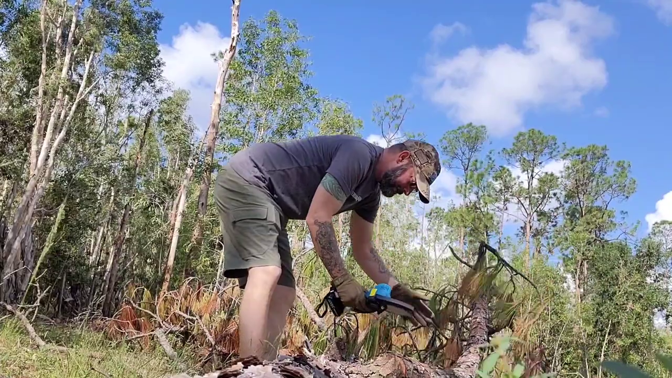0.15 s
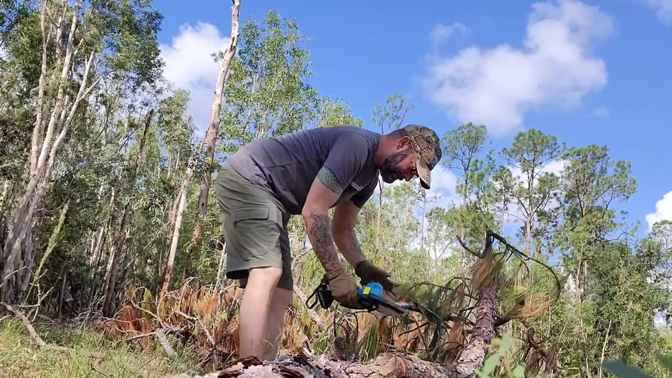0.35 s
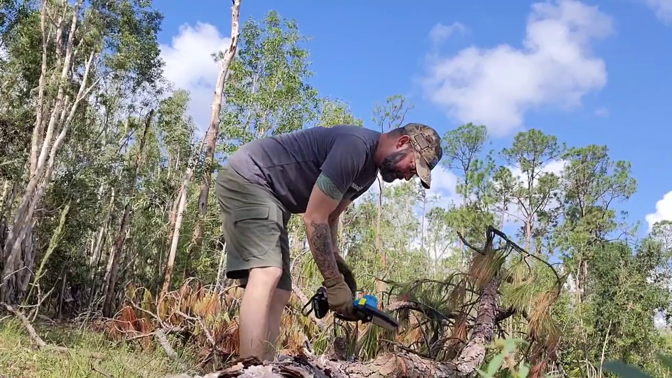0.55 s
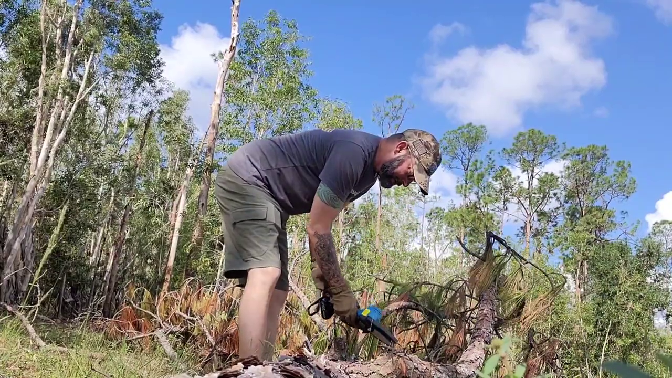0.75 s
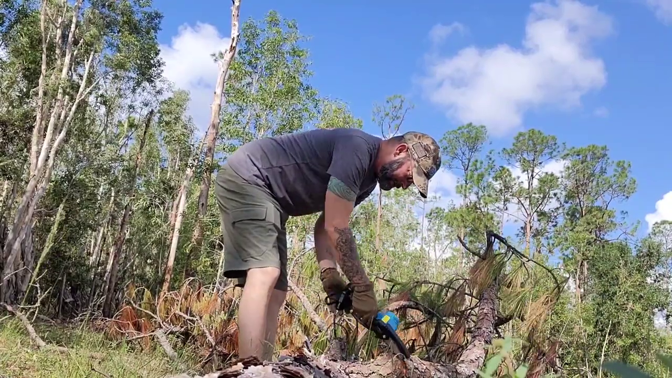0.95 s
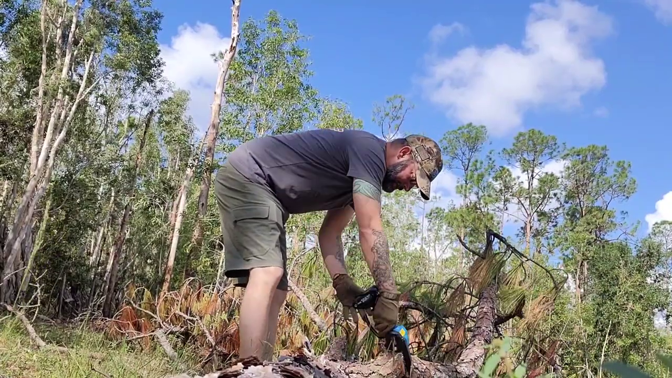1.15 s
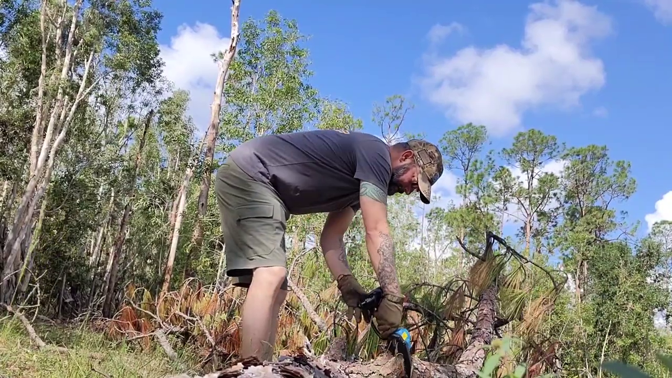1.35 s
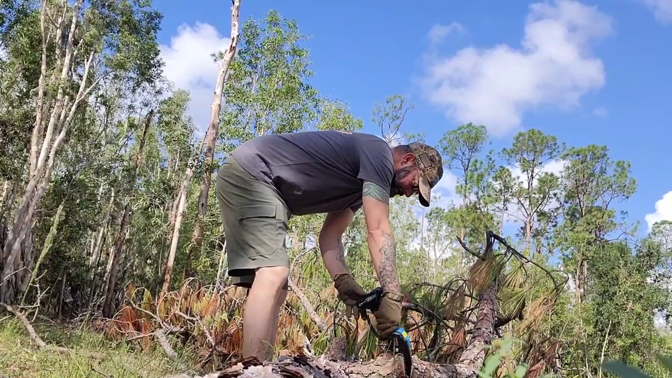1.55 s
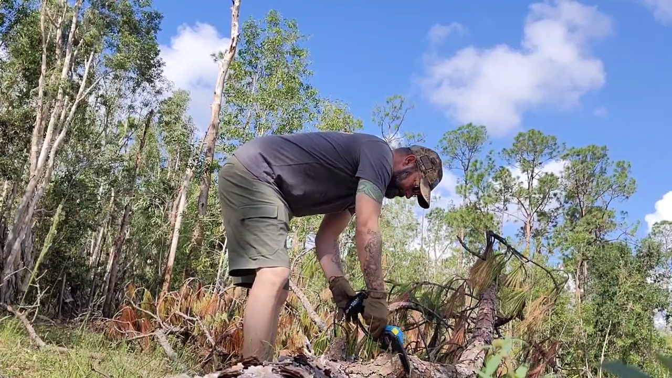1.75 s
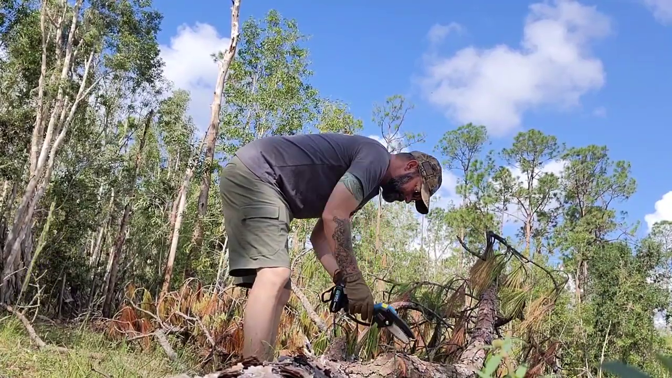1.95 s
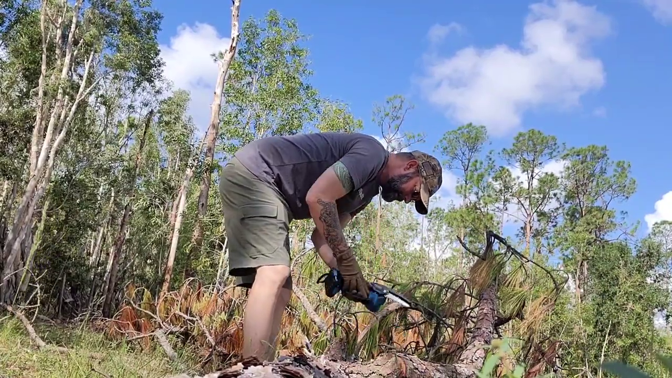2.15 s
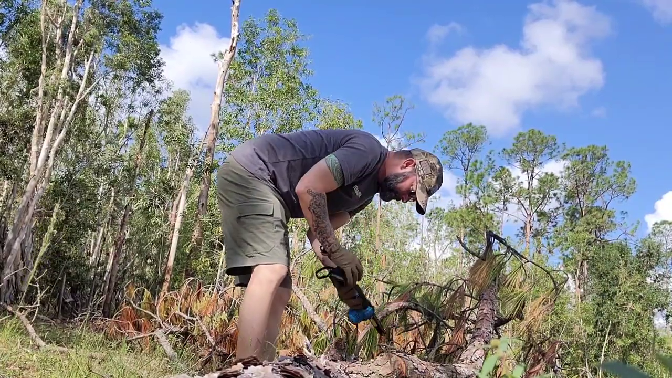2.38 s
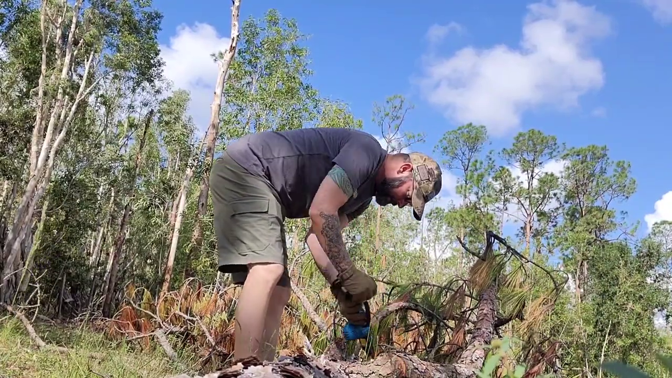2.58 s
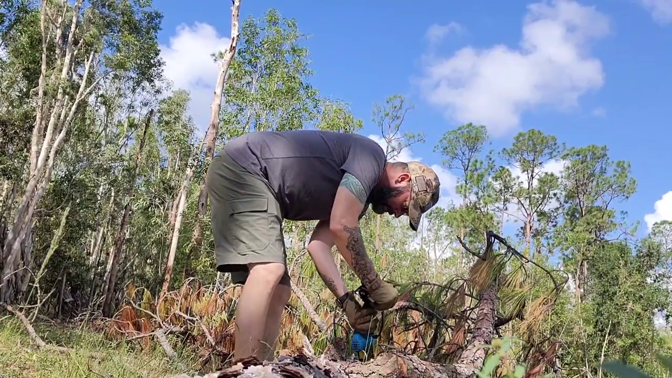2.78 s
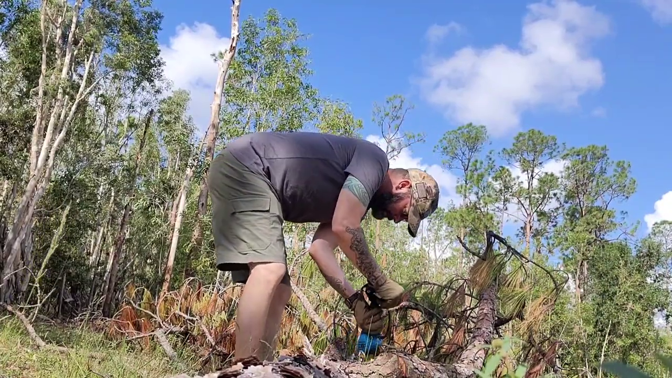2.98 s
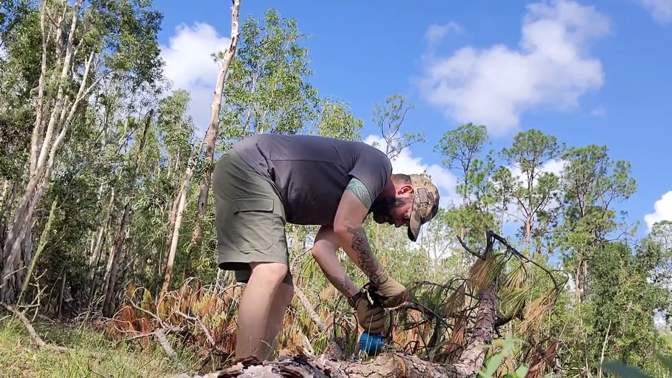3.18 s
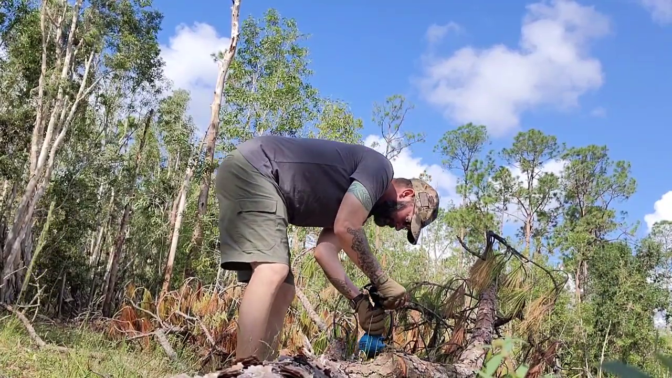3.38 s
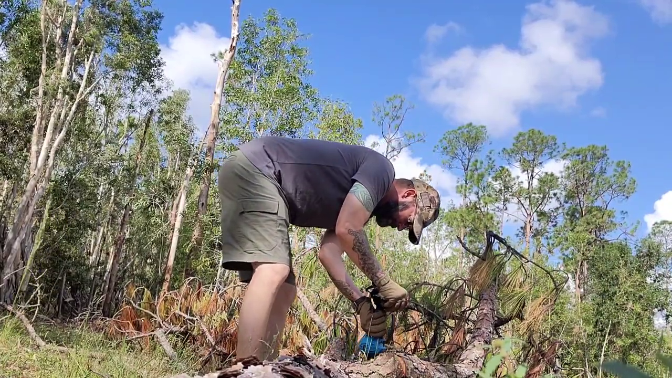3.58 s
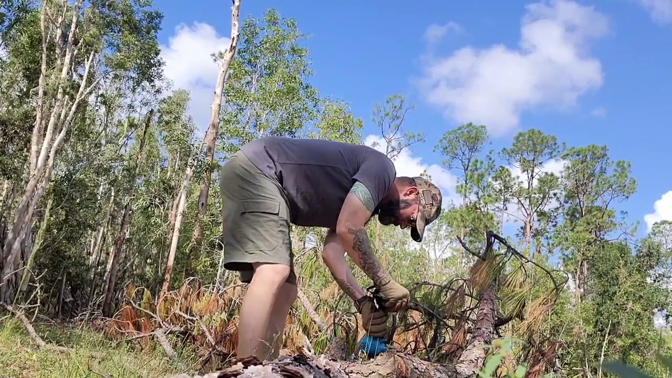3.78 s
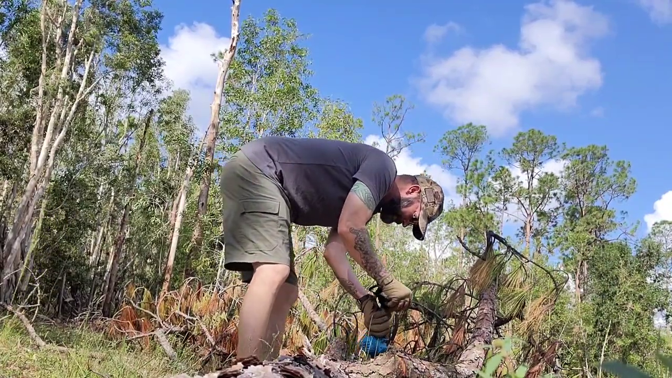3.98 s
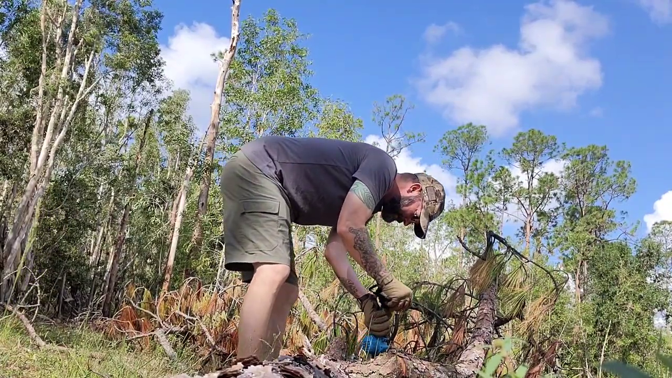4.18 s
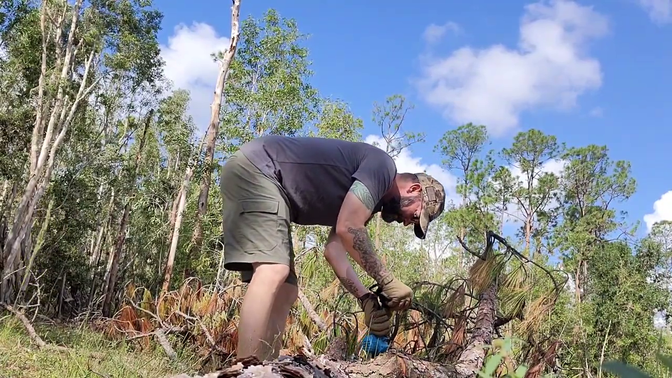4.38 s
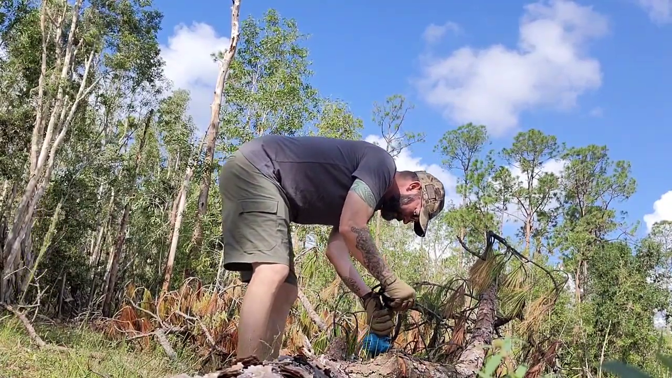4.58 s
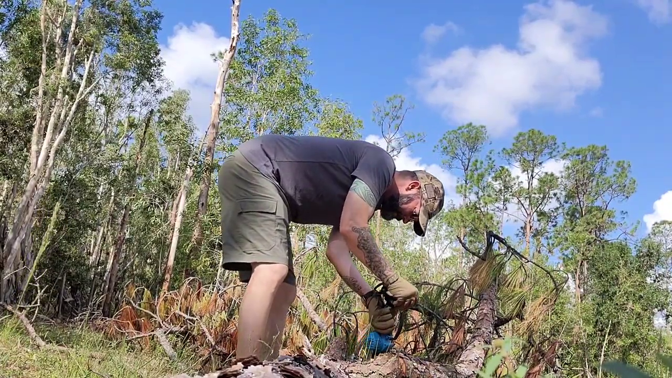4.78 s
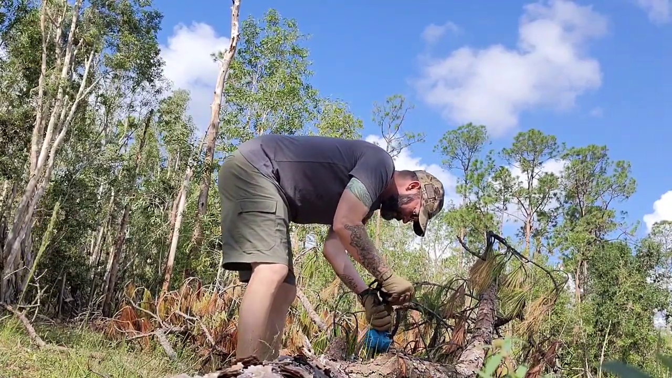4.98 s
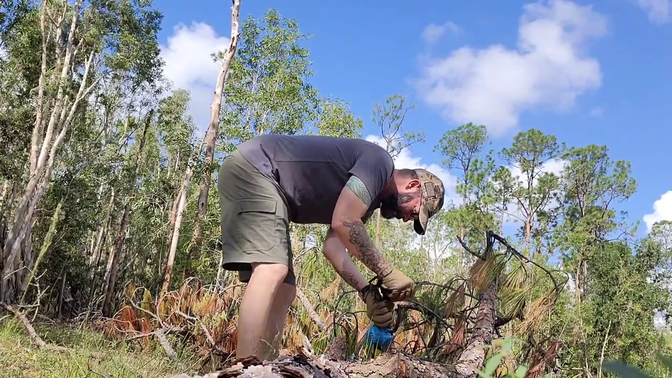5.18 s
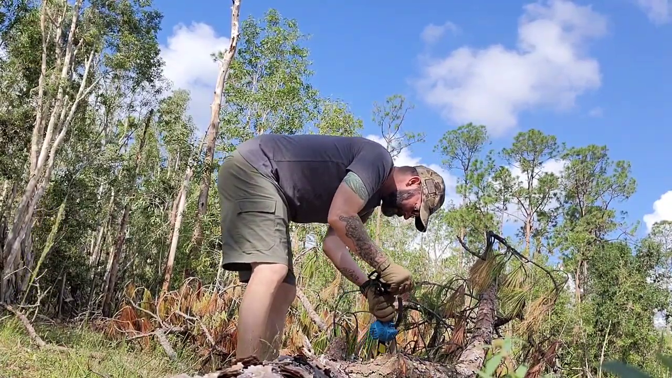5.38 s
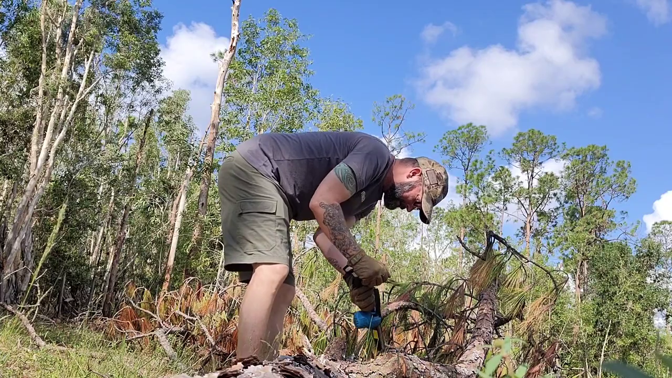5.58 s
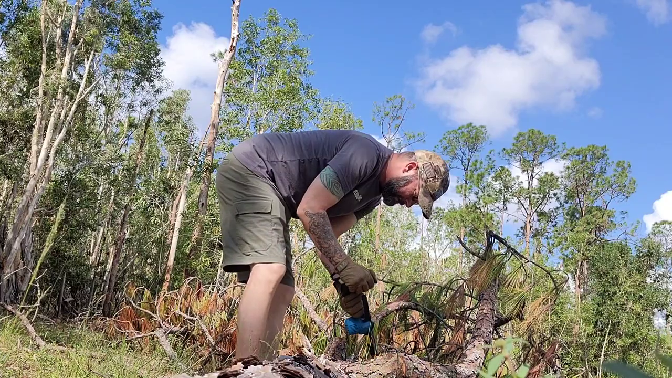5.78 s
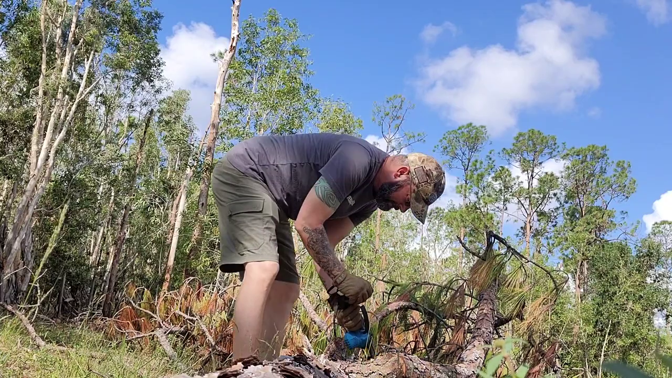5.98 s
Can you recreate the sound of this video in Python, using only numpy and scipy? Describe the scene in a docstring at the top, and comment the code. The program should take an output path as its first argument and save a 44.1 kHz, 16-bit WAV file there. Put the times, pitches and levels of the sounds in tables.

```python
"""Small cordless chainsaw on a fallen pine

The chain coasts to rest as a cut branch thumps down; twigs crack, needles rustle and the saw is shifted.
Insects sing, high tones shimmer and a far engine idles. Then the motor starts, labours as the cutters bite
into the log, and runs free again once they are through. Timed blows shake filtered bodies (links, cutters,
twigs, knocks); sines locked to the chain speed make the motor's tones; shaped noise makes air and insects.
"""
import sys
import numpy as np
from scipy import signal
from scipy.fft import rfft, irfft, next_fast_len
from scipy.io import wavfile
from scipy.ndimage import uniform_filter1d

SR = 44100
rng = np.random.default_rng(int(sys.argv[2]) if len(sys.argv) > 2 else 0)


def master(y):
    """Save y as 16-bit WAV."""
    cut = np.clip(np.atleast_2d(y).T, -1, 1)
    pcm = np.round(cut * 32767)  # scale
    wavfile.write(sys.argv[1], SR, pcm.astype(np.int16))


N = 266364
TIME = np.arange(N) / SR


def from_db(db):
    """Amplitude factor of a level in dB."""
    return 10 ** (np.asarray(db) / 20)


def rms_one(x):
    """Scale to rms 1."""
    return x / np.sqrt(np.mean(x ** 2) + 1e-20)


def in_time(rows):
    """The columns of a curve table at every sample."""
    s, *columns = np.transpose(rows)
    return [np.interp(TIME, s, column) for column in columns]


def between(start_s, end_s, fade_s):
    """Gain that fades in and out around two times."""
    return np.clip(np.minimum(TIME - start_s, end_s - TIME) / fade_s + .5, 0, 1)


def drift(rate_hz):
    """Slow chance with spread 1: two-pole low-passed noise, computed every 40 samples."""
    pole = np.exp(-80 * np.pi * rate_hz / SR)
    noise = rng.standard_normal(N // 40 + 2002)
    slow = signal.lfilter([1], [1, -2 * pole, pole * pole], noise)[2000:]
    return np.interp(np.arange(N) / 40, np.arange(len(slow)), rms_one(slow))


def coloured(x, spectrum):
    """Causal (minimum-phase) filter with the given spectrum."""
    size = 2 * next_fast_len(N // 2 + 4096)
    hz, db = np.transpose(spectrum)
    grid_hz = np.maximum(np.arange(size // 2 + 1) * SR / size, 1)
    gain_db = np.interp(np.log(grid_hz), np.log(np.maximum(hz, 1)), db)
    cepstrum = irfft(np.log(from_db(gain_db)))
    cepstrum[1:size // 2] *= 2
    cepstrum[size // 2 + 1:] = 0
    return irfft(rfft(x, size) * np.exp(rfft(cepstrum)))[..., :N]


def noise_pair(alike):
    """Two white noises with the given correlation."""
    alike = np.clip(alike, -1, 1)
    mid, side = rng.standard_normal((2, N))
    return np.sqrt((1 + alike) / 2) * mid + np.sqrt((1 - alike) / 2) * side * [[1], [-1]]


def clicks(seconds, sizes):
    """Single-sample blows at the given times."""
    out = np.zeros(N)
    index = np.round(np.asarray(seconds) * SR).astype(int)
    np.add.at(out, np.clip(index, 0, N - 1), sizes)
    return out


def strikes(turns, jitter, spread_db):
    """One blow per turn, each a little off in time and strength."""
    count = np.arange(1, int(turns[-1]))
    late, strength = rng.standard_normal((8000, 2))[:len(count)].T
    return clicks(np.interp(count + jitter * late, turns, TIME), from_db(spread_db * strength))


def dying(x, t60_s):
    """Every blow leaves an exponential tail."""
    return signal.lfilter([1], [1, -from_db(-60 / (t60_s * SR))], x + 1e-18)


def resonance(hz, centre_hz, width_hz):
    """Gain of a resonance for a tone that glides through it; 1 on top."""
    return 1 / np.hypot(1, 2 * (hz - centre_hz) / width_hz)


# left channel of the saw against the right: pitch_hz, gain_db
LEFT_BALANCE = [(60, -2), (110, -5), (200, -13.5), (380, -3), (700, 2), (1290, -3), (2380, 0.5),
                (4400, 0.5), (8120, -8.5), (15000, 3.5)]
LEFT_LAG_S = .00006


def placed(pair):
    """The saw is a little to the right: the left ear hears it later, with its own spectral balance."""
    left = coloured(np.interp(TIME - LEFT_LAG_S, TIME, pair[0]), LEFT_BALANCE)
    return np.array([left, pair[1]])


def sounding(shaking, spectrum):
    """A body shaken by a steady signal, at the saw's place; left-right mean has rms 1."""
    pair = placed(coloured(shaking, spectrum))
    return pair / np.sqrt(np.mean(pair.mean(axis=0) ** 2))


# outdoor air, relative spectrum: pitch_hz, density_db
AIR_SPECTRUM = [(12, -46), (20, -17), (37, -4), (87, -6.5), (150, -20), (182, -9), (250, -22.5), (344, -22),
                (473, -23.5), (611, -31.5), (1690, -44), (3200, -43.5), (4160, -83), (7040, -120)]
AIR_DB = -52.5


def low_air():
    """Low air: noise shaped by its spectrum, partly alike in both ears."""
    return from_db(AIR_DB) * rms_one(coloured(noise_pair(0.26), AIR_SPECTRUM))


# far engine's hum, before wavering and easing: pitch_hz, level_db
IDLE_TONES = [(48.4, -60), (80.7, -57), (177.6, -65)]


def far_engine():
    """Far idling engine: low tones wavering slowly, out of step between the ears."""
    apart_rad = np.array([[0], [1.2]])
    out = 0
    for hz, db in IDLE_TONES:
        phase = 2 * np.pi * hz * TIME + 0.17 * drift(1.8) + apart_rad
        out = out + from_db(db + 0.28 * drift(4.7)) * np.sqrt(2) * np.sin(phase)
    return out


# insect chorus, relative spectrum: pitch_hz, density_db
INSECT_SPECTRUM = [(1760, -57), (3000, -28), (3650, -12.5), (4540, -12.5), (5140, -14.5), (5600, -10),
                   (6950, -12.5), (7510, -8.5), (9140, -14.5), (10300, -19.5), (12000, -25), (16000, -30)]
INSECT_DB = -66.7


def insects():
    """Insect chorus: high shaped noise whose level wavers fast and slowly."""
    level_db = INSECT_DB + 0.39 * drift(22) + .5 * drift(1.7)
    return from_db(level_db) * rms_one(coloured(noise_pair(0.062), INSECT_SPECTRUM))


SHIMMER_DB, SHIMMER_TONES, SHIMMER_TURN_S = -65, 90, 1.3


def shimmer():
    """A crowd of thin high tones of unequal strength; one set gives way to the next."""
    size = next_fast_len(N)
    hz = np.arange(size // 2 + 1) * SR / size
    out, pair = 0, rfft(noise_pair(0), size)
    for s in np.arange(0, N / SR + SHIMMER_TURN_S, SHIMMER_TURN_S):
        scatter, strength = rng.standard_normal((2, SHIMMER_TONES))
        pitches_hz = np.linspace(3500, 9300, SHIMMER_TONES) + 22 * scatter
        lines = np.zeros(len(hz))
        lines[np.searchsorted(hz, pitches_hz)] = from_db(3.5 * np.clip(strength, -2, 2))
        lines = uniform_filter1d(lines, size=13)
        fade = np.cos(np.pi / 2 * np.clip((TIME - s) / SHIMMER_TURN_S, -1, 1))
        out = out + fade * rms_one(irfft(pair * lines, size)[:, :N])
    return from_db(SHIMMER_DB) * rms_one(coloured(out, INSECT_SPECTRUM))


def outdoors():
    """Air and far engine, a little left and easing by 4 dB near the end, under insects and shimmer."""
    easing = from_db(np.interp(TIME, [5.1, 5.5], [0, -4]))
    low = easing * (low_air() + far_engine()) * from_db([[1.5], [-1.2]])
    return low + insects() + shimmer()


# wood, rattle, hiss of the coasting chain, before each source's trim: start_level_db, speed_power
COAST_LAWS = [(-43.5, 2.23), (-47, 1.1), (-44, 2.4)]
COAST_S, COAST_CUTTERS_PER_S = .82, 122


def coasting():
    """Unpowered, the chain slows evenly, and each of its sounds dies with a power of the speed."""
    speed = np.clip(1 - TIME / COAST_S, 1e-4, 1)
    wood_db, rattle_db, hiss_db = [db + power * 20 * np.log10(speed) for db, power in COAST_LAWS]
    return COAST_CUTTERS_PER_S * speed, wood_db, rattle_db, hiss_db


CUTTERS_PER_REV, FLUTTER_DB = 3.5, 2.2


def flutter(turns):
    """The chain tightens and slackens two and, more weakly, three times per turn of the sprocket."""
    sprocket = 2 * np.pi * turns / CUTTERS_PER_REV
    return np.sin(2 * sprocket) + .6 * np.sin(3 * sprocket)


# saw housing, relative spectrum: pitch_hz, density_db
HOUSING_SPECTRUM = [(200, -20), (700, -19.5), (1100, -6), (1270, -10.5), (1650, 0.5), (1900, -5),
                    (2150, 1.5), (2400, -1.5), (2900, -4.5), (3400, -20), (4400, -16), (7000, -24.5),
                    (16000, -69)]
# chain and bar steel, relative spectrum: pitch_hz, density_db
STEEL_SPECTRUM = [(1500, -18.5), (3500, -18), (4150, -13), (4600, -28), (5000, -6), (5450, -4), (5850, -14),
                  (6600, -2), (7300, -2), (7800, 3.5), (8900, -4.5), (10100, -3), (11300, -8), (13000, 0.5),
                  (15500, 0.5), (17000, -5.5)]
LINK_T60_S, SWING_DB = .028, 1.3
RATTLE_TRIM_DB, HISS_TRIM_DB = -2.0, 0.2


def chain(turns, rattle_db, hiss_db):
    """Links slap sprocket and bar 4x per cutter; level swings per cutter pair, flutters at full speed."""
    links = strikes(4 * turns, jitter=.08, spread_db=3)
    slaps = rms_one(dying(links, LINK_T60_S))
    fast = np.interp(np.gradient(turns) * SR, (136, 140), [0, 1])   # cutters per s
    swing_db = SWING_DB * (-1.5 - fast) * np.sin(np.pi * turns)
    swing = from_db(swing_db + FLUTTER_DB * fast * flutter(turns))
    rattling = slaps * swing * from_db(0.28 * drift(35.2)) * noise_pair(0.87)
    hissing = (slaps + 1.78) * np.sqrt(swing) * from_db(1.1 * drift(16)) * noise_pair(0.46)
    rattle = from_db(rattle_db + RATTLE_TRIM_DB) * sounding(rattling, HOUSING_SPECTRUM)
    return rattle + from_db(hiss_db + HISS_TRIM_DB) * sounding(hissing, STEEL_SPECTRUM)


# torn log, relative spectrum: pitch_hz, density_db
LOG_SPECTRUM = [(60, -15), (150, -13), (260, -24), (360, 4), (430, -6), (520, 0.5), (620, -4.5), (800, 0),
                (950, -2.5), (1200, -11.5), (1600, -13), (4000, -62)]
# evenly chopped log, relative spectrum: pitch_hz, gain_db
CHOP_SPECTRUM = [(100, -18), (230, -12.5), (350, -18.5), (480, 10), (580, -3.5), (700, 5.5), (820, 12.5),
                 (885, 4), (955, 8), (1100, -2.5), (1250, 2.5), (1500, -9), (4000, -72)]
WOOD_TRIM_DB, GROWL_REL_DB, GROWL_WAVER_DB = -4.0, 3.5, 2


def kerf(turns, wood_db, even):
    """Even bites growl in wavering harmonics of the cutter rate; a chattering saw tears fibres at random."""
    even = np.clip(even, 0, 1)
    angle = 2 * np.pi * turns + .05 * drift(25)
    chops = 0
    for k in range(1, 14):
        chops = chops + from_db(GROWL_WAVER_DB * drift(9)) * np.cos(k * angle + .2 * drift(15))
    tears = dying(strikes(turns, jitter=0.18, spread_db=1.2), t60_s=0.038) * noise_pair(0.97)
    tears = tears * from_db(1.4 * np.sin(np.pi * turns))   # the cutters of one side bite deeper
    growl = from_db(GROWL_REL_DB) * even * sounding(np.array([chops, chops]), CHOP_SPECTRUM)
    tearing = (1 - even) ** .75 * sounding(tears, LOG_SPECTRUM)
    return from_db(wood_db + WOOD_TRIM_DB) * (growl + tearing)


# cracking twigs and knocks on the saw, drive levels:
# start_s, ring_hz, ring_db, wood_db, snap_db, t60_s
CRACK_EVENTS = [(0.061, 2650, -26, -23, -43, 0.03), (0.0667, 2170, -32, -31, -19, 0.022),
                (0.133, 2190, -48, -42.5, -54, 0.14), (0.339, 2100, -45, -66, -36, 0.2),
                (0.463, 2230, -55, -66, -60, .06), (0.565, 1690, -54, -51, -66, 0.068),
                (0.616, 1690, -59.5, -55.5, -68, 0.089), (0.701, 2200, -66, -53.5, -73, 0.074),
                (0.836, 1600, -60, -60, -75, 0.11), (1.024, 1720, -61, -59, -49, 0.066),
                (1.18, 1900, -55, -60, -55, 0.06), (1.247, 2100, -53, -49.5, -50, 0.08),
                (1.313, 2520, -50.5, -42.5, -61, 0.032), (1.686, 2470, -61, -74, -65, .06),
                (1.744, 2300, -62, -63, -73, 0.14), (1.845, 1570, -47, -57, -43.5, 0.056),
                (2.2109, 2330, -35, -39, -45, 0.016), (2.215, 2500, -43, -51, -40, 0.02),
                (2.226, 2400, -38.5, -47, -40, 0.033), (2.24, 2600, -55.5, -63, -66, 0.25),
                (2.93, 2660, -43, -54, -51, 0.038)]
SNAP_T60_S = 0.023   # of the sharp snap, whatever the row's t60_s


def cracks():
    """Bursts of splintering and contact ring at their own pitch and also sound the wood and the steel."""
    grain, out, wood = noise_pair(0.37), 0, 0
    for s, hz, ring_db, wood_db, _, t60_s in CRACK_EVENTS:
        burst = dying(clicks([s], 0.88), t60_s) * grain
        b, a = signal.iirpeak(hz, 4.5, fs=SR)
        out = out + from_db(ring_db) * signal.lfilter(b, a, burst) / np.sqrt(b[0])
        wood = wood + from_db(wood_db) * burst
    s, _, _, _, snap_db, _ = np.transpose(CRACK_EVENTS)
    snap = dying(clicks(s, from_db(snap_db)), SNAP_T60_S) * grain
    for bursts, spectrum in ((wood, LOG_SPECTRUM), (snap, STEEL_SPECTRUM)):
        out = out + coloured(bursts, spectrum) / np.std(coloured(grain[0], spectrum))
    return placed(out)


# branch landing and bouncing, upper-band blows: start_s, peak_db
THUMP_EVENTS = [(0.0628, -12.5), (0.0675, -24), (0.134, -39), (0.2068, -30), (0.231, -40), (0.511, -48),
                (0.557, -50)]


def thuds(rows, low_hz, high_hz):
    """Heavy, damped wood rings for only a cycle or two."""
    s, db = np.transpose(rows)
    body = signal.butter(2, [low_hz, high_hz], "band", fs=SR, output="sos")
    height = np.abs(signal.sosfilt(body, signal.unit_impulse(2000))).max()
    return signal.sosfilt(body, clicks(s, from_db(db)) + 1e-18) / height


def landing():
    """The branch lands: each blow rings an upper band and, 13 dB weaker, a lower one."""
    upper = thuds(THUMP_EVENTS, low_hz=534, high_hz=916)
    return upper + from_db(-13.0) * thuds(THUMP_EVENTS, low_hz=150, high_hz=383)


# needle rustle, before wavering: time_s, level_db
RUSTLE_LEVEL = [(0.36, -80), (0.46, -64), (0.64, -65), (0.72, -70), (1.0, -72.5), (1.3, -76), (1.7, -100)]


def needles():
    """Dry needles rustle as the fallen branch settles: wavering bright noise."""
    level_db = in_time(RUSTLE_LEVEL)[0] + 1.5 * drift(40)
    return from_db(level_db) * sounding(noise_pair(0.26), STEEL_SPECTRUM)


# two knocks as the saw is shifted, then the trigger click: start_s, drive_db
KNOCK_EVENTS = [(2.2109, -33), (2.2234, -32.5), (2.894, -51.5)]
# modes of the knocked saw: pitch_hz, relative_db, t60_s
KNOCK_MODES = [(760, -15, 0.028), (1600, -16, 0.049), (2380, 3, 0.018), (2740, -12, 0.062),
               (3900, -14.5, 0.039), (5850, -2, 0.022), (6850, -5, 0.024), (8700, -13, 0.022)]


def knocks():
    """Each knock sets the saw's modes ringing."""
    s, drive_db = np.transpose(KNOCK_EVENTS)
    t, ring = TIME[:SR], 0
    for hz, db, t60_s in KNOCK_MODES:
        ring = ring + from_db(db - 60 * t / t60_s) * np.sin(2 * np.pi * hz * t)
    out = signal.fftconvolve(clicks(s, from_db(drive_db)), ring)[:N]
    return placed([out, out])


# bar bounces and the cutters dig in: start_s, length_s, extra_db
DIG_EVENTS = [(3.019, 0.053, 9), (3.431, 0.029, 3), (3.514, 0.066, 2.5), (3.674, 0.025, 3.5),
              (3.732, 0.13, 3), (3.914, 0.039, 5), (4.079, 0.12, 3), (4.179, 0.074, 4.5), (4.27, 0.15, 3),
              (4.458, 0.056, 2), (4.586, 0.15, 2), (5.034, 0.052, 0.5), (5.22, 0.025, 5)]
DIG_ATTACK_S, DIG_RELEASE_S = 0.0087, 0.023


def digging():
    """Extra dB while the cutters dig in: attack, hold, release."""
    out = 0
    for s, length_s, db in DIG_EVENTS:
        attack = (TIME - s) / DIG_ATTACK_S
        release = (s + length_s - TIME) / DIG_RELEASE_S + 1
        out = out + db * np.clip(np.minimum(attack, release), 0, 1)
    return out


# bar buzz, strongest running free, before trim and flutter: time_s, level_db
BUZZ_LEVEL = [(2.98, -60), (3.15, -44.5), (3.4, -41.5), (3.7, -40), (4.1, -48.5), (5.1, -44), (5.42, -59),
              (5.55, -40), (5.66, -33.5), (5.86, -37.5), (5.95, -42), (6.04, -55)]
# side tones of the running chain at full buzz, before trim: cutter_rate_multiple, level_db
CHAIN_TONES = [(4, -55), (4.55, -58), (8.571, -48), (10.17, -52), (12, -47), (12.571, -47)]
# bar rubbing the side of the kerf: pitch_hz, level_db, start_s, end_s
SQUEAL_TONES = [(1431, -43.5, 4.97, 5.11), (2513, -50.5, 4.5, 4.7), (2945, -49, 4.85, 5.12)]
BAR_RING_HZ, BAR_RING_WIDTH_HZ, SQUEAL_FADE_S = 1717, 310, 0.057
BUZZ_TRIM_DB, TONES_TRIM_DB, TONES_DB_PER_BUZZ_DB = -2.5, -1, 0.16


def bar(angle, rate):
    """Sprocket turns shake the bar: a comb of lines buzzes in its resonance; it sings at fixed pitches."""
    buzz_db, = in_time(BUZZ_LEVEL)
    orders = np.arange(36, 50) / CUTTERS_PER_REV
    gains = np.array([resonance(order * rate, BAR_RING_HZ, BAR_RING_WIDTH_HZ) ** 3 for order in orders])
    comb, tones, squeal = 0, 0, 0
    for order, gain in zip(orders, gains):
        comb = comb + gain * np.sin(order * angle + 2 * np.pi * rng.random() + .75 * drift(14))
    comb = comb / np.sqrt(np.sum(gains ** 2, axis=0) + 0.26)
    buzz = from_db(buzz_db + FLUTTER_DB * flutter(angle / (2 * np.pi)) + BUZZ_TRIM_DB) * comb
    for order, db in CHAIN_TONES:
        tones = tones + from_db(db + drift(10)) * np.sin(order * angle + .25 * drift(12))
    tones = tones * from_db(TONES_TRIM_DB + TONES_DB_PER_BUZZ_DB * (buzz_db - buzz_db.max()))
    for hz, db, start_s, end_s in SQUEAL_TONES:
        tone = np.sin(2 * np.pi * hz * TIME + 0.64 * drift(31))
        squeal = squeal + from_db(db) * between(start_s, end_s, SQUEAL_FADE_S) * tone
    return buzz + tones + squeal


# bar enters the log, comes out below: time_s
KERF_SPAN = [3.64, 4.7]
# sprocket whine, before wavering and the common sqrt(2): time_s, level_db
WHINE_LEVEL = [(3.0, -56), (3.2, -47), (3.42, -43.5), (3.6, -73), (5.33, -46), (5.4, -43.5), (5.5, -49.5),
               (5.55, -40.5), (5.7, -39.5), (5.81, -39), (5.88, -45), (5.95, -71)]
# gear whine under light load, before trim and wavering: start_s, end_s, level_db
GEAR_WHINES = [(3.07, 3.56, -41.5), (5.24, 5.42, -41)]
GEAR_FADE_S, GEAR_TRIM_DB = 0.059, -3
# shake and octave relative to the feed's wood level
SHAKE_HZ, SHAKE_WIDTH_HZ, SHAKE_REL_DB, SHAKE_FADE_DB = 118, 25, -4.5, 58
OCTAVE_HZ, OCTAVE_WIDTH_HZ, OCTAVE_REL_DB = 214, 50, -12.5


def motor_tones(turns, rate, feed_db):
    """Tones locked to the chain: the log shakes and rings at the octave; sprocket, gears and bar whine."""
    angle = 2 * np.pi * turns
    apart_rad = np.array([[0], [2.2]])
    depth = np.interp(TIME, KERF_SPAN, [0, 1])
    shake_db = feed_db + SHAKE_REL_DB - SHAKE_FADE_DB * depth ** 2 + 2.0 * drift(10)   # fades as kerf deepens
    shake = from_db(shake_db) * resonance(rate, SHAKE_HZ, SHAKE_WIDTH_HZ) * np.sin(angle + apart_rad)
    octave = from_db(feed_db + OCTAVE_REL_DB + 0.4 * drift(26)) * np.sin(2 * angle + apart_rad)
    octave = octave * resonance(2 * rate, OCTAVE_HZ, OCTAVE_WIDTH_HZ)
    whine_db = in_time(WHINE_LEVEL)[0] + 1.5 * drift(20)
    sprocket = from_db(whine_db) * np.sin(8 * angle + .32 * drift(28))
    gear = sum(from_db(db) * between(start_s, end_s, GEAR_FADE_S) for start_s, end_s, db in GEAR_WHINES)
    gear = gear * from_db(2.2 * drift(25) + GEAR_TRIM_DB) * np.sin(40.4 * angle + .7 * drift(45))
    high = sprocket + gear + bar(angle, rate)
    return np.sqrt(2) * (shake + octave + placed([high, high]))


# chain speed under power: time_s, cutters_per_s
SPEED_CURVE = [(2.93, 80), (3.0, 112), (3.08, 127), (3.18, 136.6), (3.32, 135.5), (3.48, 126.5),
               (3.6, 118.5), (3.81, 111.5), (4.0, 107), (4.2, 108), (4.62, 113.5), (4.74, 113),
               (4.79, 107.3), (4.84, 110), (4.89, 111), (4.944, 117), (4.996, 120.9), (5.035, 118.4),
               (5.13, 117.6), (5.185, 122.8), (5.276, 127.4), (5.35, 127.4), (5.42, 138.5), (5.5, 141),
               (5.7, 141.8), (6.04, 141)]
# feed into the log, before digging and trim: time_s, wood_db, even_share
FEED_CURVE = [(2.95, -51.5, 0.4), (3.27, -45.5, 0.58), (3.45, -39.5, 0.04), (4.0, -37, 0.22),
              (4.71, -37, 0.02), (4.77, -28.5, 0.73), (5.06, -32.5, 0.67), (5.33, -38, 0.67),
              (5.38, -54, 0.7), (5.7, -73, 0.25), (5.89, -61, 0.3), (6.04, -46, 0.8)]
# chain treble hiss, before digging and trim: time_s, level_db
HISS_LEVEL = [(2.93, -48), (3.04, -43), (3.45, -39.5), (4.68, -39), (4.79, -34), (4.98, -37), (5.08, -34),
              (5.17, -36.5), (5.26, -33.5), (5.37, -37), (5.63, -32.5), (5.88, -33.5), (6.04, -40.5)]
# ground under the log, relative spectrum: pitch_hz, density_db
GROUND_SPECTRUM = [(30, -15), (65, 13), (120, -4), (220, 1.5), (350, 1), (500, 1), (1000, -59)]
START_S, SPIN_UP_S, TONES_LATE_S, TONES_RISE_S = 2.925, 0.02, 0.08, 0.086
FREE_RATTLE_DB, LOADED_EXTRA_DB = -39.5, 5.5   # before the rattle trim
HISS_DB_PER_DIG_DB, RUMBLE_REL_DB = 0.33, -5.5
SLACK_S, SLACK_DB = 0.031, -71


def saw():
    """Chain coasts and rests; started, it rattles at once, whines up to speed, roars as fed into the log."""
    feed_db, even = in_time(FEED_CURVE)
    even, dig_db = np.clip(even, 0, 1), digging()
    cut_db = feed_db + dig_db
    clatter_db = FREE_RATTLE_DB + LOADED_EXTRA_DB * np.interp(cut_db, [-50, -25.5], [0, 1])
    powered_hiss_db = in_time(HISS_LEVEL)[0] + HISS_DB_PER_DIG_DB * dig_db
    powered = [in_time(SPEED_CURVE)[0], cut_db, clatter_db, powered_hiss_db]
    rate, wood_db, rattle_db, hiss_db = np.where(TIME > START_S, powered, coasting())
    turns = np.cumsum(rate) / SR   # counted in cutters
    running = 1 - np.exp(-np.maximum(TIME - START_S, 0) / SPIN_UP_S)
    up_to_speed = np.clip((TIME - START_S - TONES_LATE_S) / TONES_RISE_S, 0, 1)
    moving = chain(turns, rattle_db, hiss_db) + kerf(turns, wood_db, running * even)
    moving = np.where(TIME > START_S, running, 1) * moving
    rumble = rms_one(coloured(noise_pair(-0.65), GROUND_SPECTRUM))
    rumble = from_db(cut_db + RUMBLE_REL_DB) * (1 - even) * rumble
    # slack taken up: faint rattle around the start
    slack = from_db(SLACK_DB) * (abs(TIME - START_S) < SLACK_S) * sounding(noise_pair(0.82), HOUSING_SPECTRUM)
    tones = up_to_speed * motor_tones(turns, rate, feed_db)
    return moving + slack + tones + running * rumble


# cutters snagging and tearing out a chip: start_s, peak_db, wood_pitch_hz
SNAG_EVENTS = [(3.348, -32, 796), (3.364, -34, 745), (3.425, -31, 750), (3.447, -27.5, 470),
               (3.481, -43, 790), (3.528, -33, 740), (3.545, -31.5, 770), (3.571, -30.5, 720),
               (3.588, -36, 740), (3.684, -35, 817), (3.735, -33, 786), (3.756, -33, 410),
               (3.777, -29, 800), (3.797, -32, 810), (3.823, -29.5, 786), (3.923, -27, 760),
               (3.949, -36, 422), (3.951, -39, 790), (4.074, -39, 450), (4.079, -27.5, 786),
               (4.097, -46, 830), (4.207, -32, 784), (4.224, -43, 890), (4.273, -35, 760),
               (4.319, -53, 855), (4.336, -30, 404), (4.403, -29, 490), (4.474, -37, 473),
               (4.565, -34, 750), (4.574, -34, 860)]
SNAG_RISE_S, SPLINTER_REL_DB = .0023, -11


def snags():
    """A snagged cutter loads the wood and lets go: a few cycles of ringing, a puff of splintering."""
    rings, swells = 0, 0
    for s, db, hz in SNAG_EVENTS:
        age_s = np.clip(TIME - s, 0, 20 * SNAG_RISE_S)
        swell = from_db(db) * age_s / SNAG_RISE_S * np.exp(1 - age_s / SNAG_RISE_S)
        rings = rings + swell * np.sin(2 * np.pi * hz * age_s)
        swells = swells + swell
    splinters = from_db(SPLINTER_REL_DB) * swells * sounding(noise_pair(0.93), LOG_SPECTRUM)
    return placed([rings, rings]) + splinters


def trees(x, t60_s, wet_db):
    """Trunks scatter a thin, dull tail, different on each side."""
    t = TIME[:SR]
    scatter = signal.lfilter([1], [1, -.6], rng.standard_normal((2, SR)))
    scatter = scatter * from_db(-60 * t / t60_s) * (t > .012)
    scatter /= np.sqrt(np.sum(scatter ** 2, axis=1, keepdims=True))
    return from_db(wet_db) * signal.fftconvolve(x, scatter, axes=1)[:, :N]


def scene():
    """Saw, wood and the open air."""
    near = saw() + cracks() + landing() + needles() + knocks() + snags()
    return near + trees(near, t60_s=0.054, wet_db=-19.5) + outdoors()


CUTOFF_HZ = 15750


def record(dry):
    """The top is cut steeply."""
    low_pass = signal.ellip(12, .2, 80, CUTOFF_HZ, fs=SR, output="sos")
    return signal.sosfilt(low_pass, dry)


dry = scene()
out = record(dry)
master(out)
```